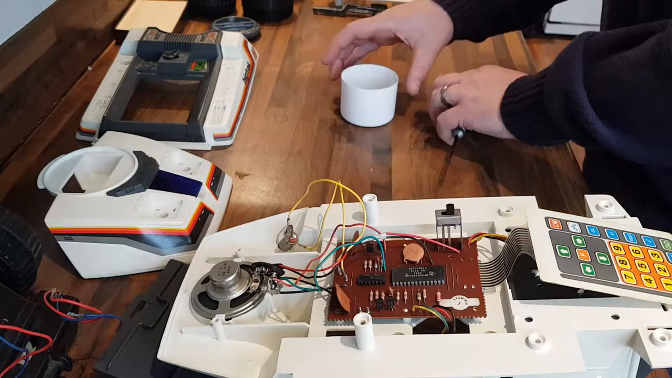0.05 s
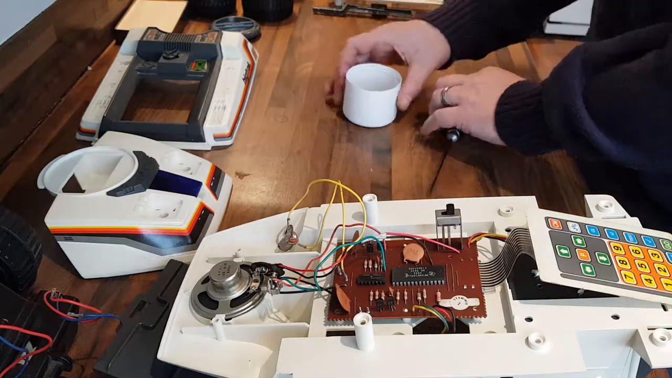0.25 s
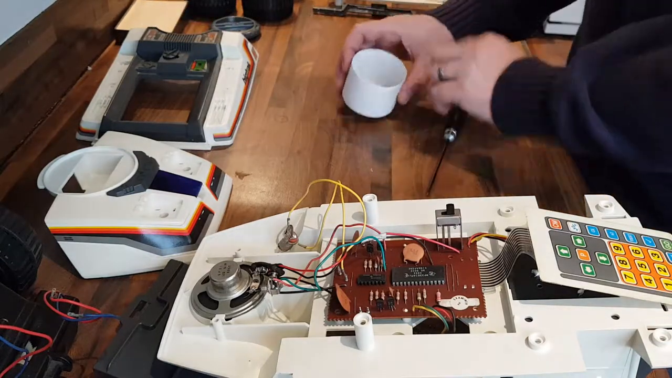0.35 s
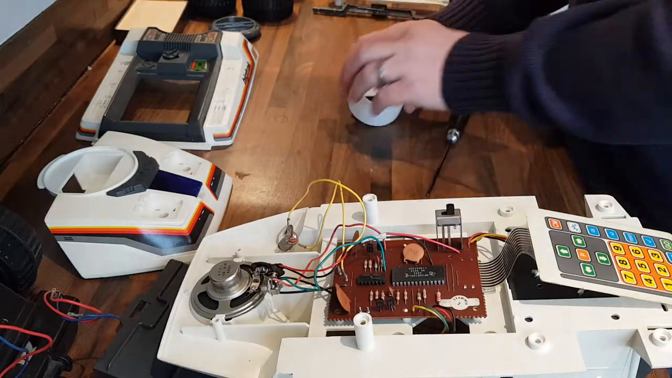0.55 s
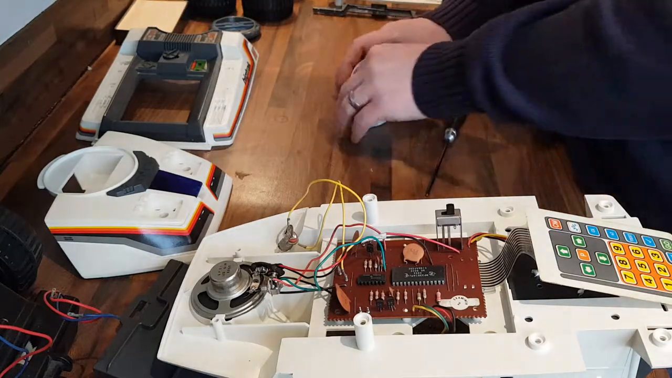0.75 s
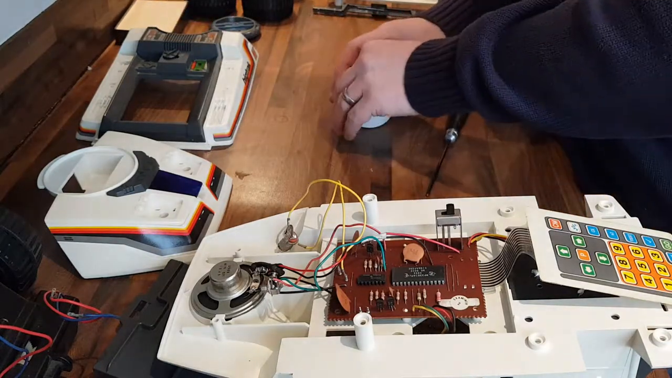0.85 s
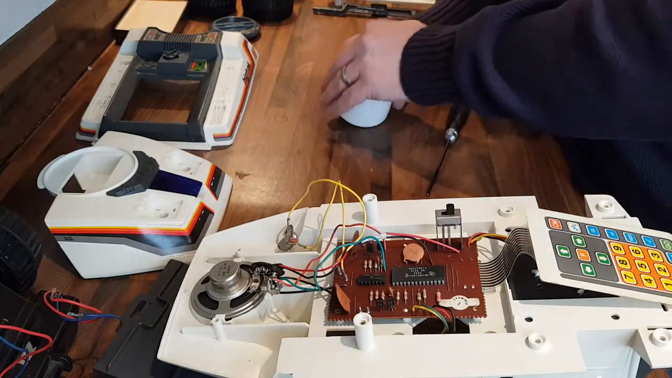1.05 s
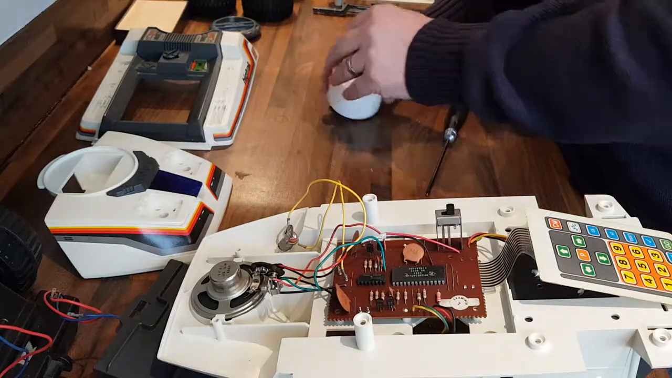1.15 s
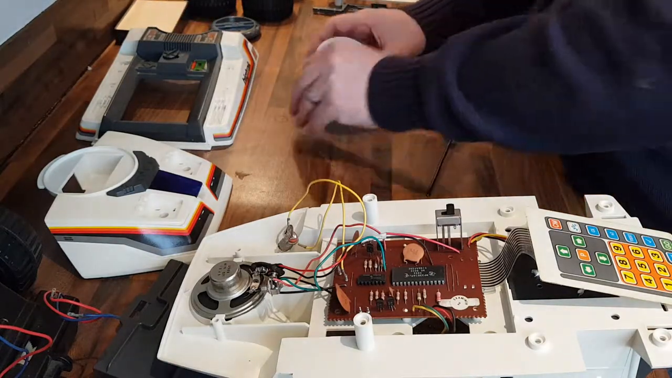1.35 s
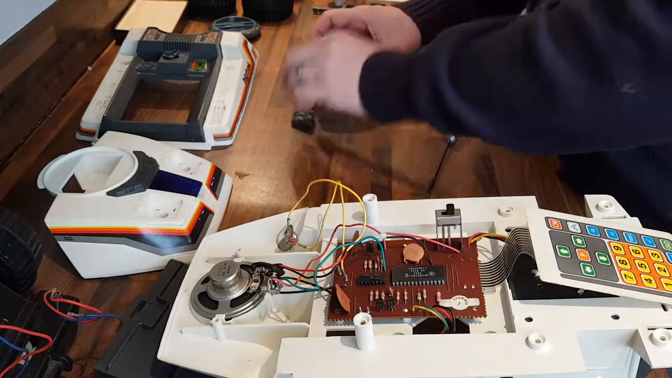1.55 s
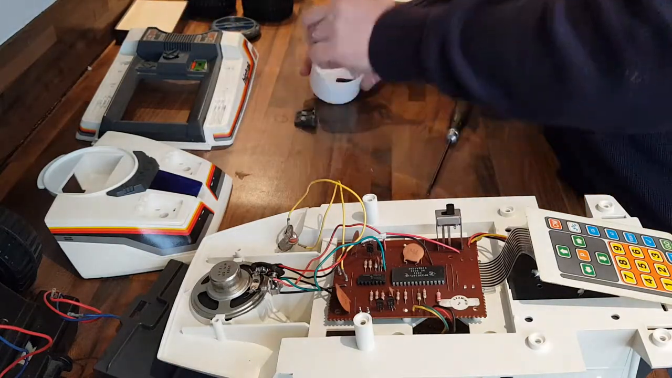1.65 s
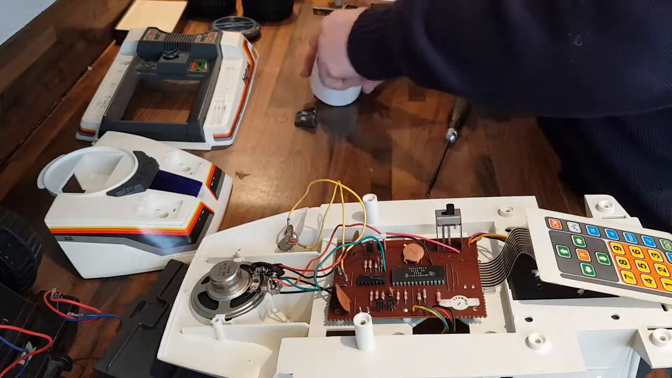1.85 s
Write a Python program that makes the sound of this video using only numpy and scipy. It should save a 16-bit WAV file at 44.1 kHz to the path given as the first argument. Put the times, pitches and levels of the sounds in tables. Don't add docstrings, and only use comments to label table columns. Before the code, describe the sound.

Small steel screws in a plastic pot over a wooden table. Faint ticks at first, then a loud, bright clatter into the pot at 0.2-0.4 s with a soft table thud. Hollow, uneven rattling from 0.55 to 1.1 s, strongest near 0.7. Near quiet, light ticks around 1.3, a rim tap at 1.47, screws landing brightly at 1.55-1.7, and a faint last knock at 1.9. Close stereo, small room.

```python
import sys
import numpy as np
from scipy import signal
from scipy.fft import rfft, irfft, next_fast_len
from scipy.io import wavfile
from scipy.ndimage import map_coordinates

SR = 44100
rng = np.random.default_rng(int(sys.argv[2]) if len(sys.argv) > 2 else 0)


def inscribe(sig):
    pcm = np.round(np.clip(np.atleast_2d(sig).T, -1, 1) * 32767)
    wavfile.write(sys.argv[1], SR, pcm.astype(np.int16))


def voltage_ratio(level):
    return 10 ** (np.asarray(level, float) / 20)


N = 85995
SCATTER_DB = 1.5


def unit(x):
    return x / np.sqrt(np.mean(x ** 2) + 1e-20)


def along(points, hz):
    point_hz, value = np.transpose(points)
    return np.interp(np.log(hz + 1), np.log(point_hz + 1), value)


def filtered(x, response):
    size = next_fast_len(x.shape[-1] + 8192)
    spectrum = rfft(x, size) * response(np.fft.rfftfreq(size, 1 / SR))
    return irfft(spectrum, size)[..., :x.shape[-1]]


def body(peaks):
    def response(f):
        total = 0
        for k, (hz, width_hz, db) in enumerate(peaks):
            damping = 1j * f * width_hz
            total = total + (-1) ** k * voltage_ratio(db) * damping / (hz * hz - f * f + damping)
        return total
    return response


def hollow_cut(f, corner_hz):
    return (1j * f / (corner_hz + 1j * f)) ** 2


def add(track, start_s, sound):
    part = track[max(round(start_s * SR), 0):][:len(sound)]
    part += sound[:len(part)]


# pitch_hz, level_db_per_hz
AIR_TONE = [(20, -15.5), (50, -4), (105, 2.5), (170, -16), (350, -22.5), (1100, -28), (5000, -37.5),
            (16000, -36)]


def air():
    middle, side = filtered(rng.standard_normal((2, N)), lambda f: voltage_ratio(along(AIR_TONE, f)))
    side = filtered(side, lambda f: (f + 30) / (f + 300))
    return voltage_ratio(-62) * unit(np.array([middle + side, middle - side]))


# pitch_hz, t60_s
ROOM_DECAY = [(150, .22), (1000, .26), (4000, .28), (12000, .22)]
# delay_s, level_db
WALLS = [(.0035, -8), (.007, -7), (.011, -13)]


def room(x):
    tail_db, spacing_s, hop, lead = -3, .0004, 4096, 64
    out = np.zeros((2, N + SR))
    padded = np.pad(x, (hop, 2 * hop))
    for start in range(0, N + hop, hop):
        hz, t, z = signal.stft(rng.standard_normal((2, SR // 2)), SR, nperseg=256)
        z[1] = np.where(hz[:, None] < 400, z[0], z[1])
        decay = voltage_ratio(-60 * t / along(ROOM_DECAY, hz)[:, None])
        tail = signal.istft(z * decay, SR, nperseg=256)[1]
        tail = voltage_ratio(tail_db) * tail / np.linalg.norm(tail[0])
        response = np.pad(tail, ((0, 0), (lead + 200, 0)))
        for delay_s, db in [(0.000028, 0.0079)] + WALLS:
            lag = spacing_s * rng.uniform(-1, 1) * SR * np.array([-.5, .5])
            response[[0, 1], np.round(lead + delay_s * SR + lag).astype(int)] += voltage_ratio(db)
        piece = padded[start:start + 2 * hop] * signal.get_window("hann", 2 * hop)
        wet = signal.fftconvolve(piece[None], response, axes=1)
        out[:, start:start + wet.shape[1]] += wet
    return out[:, hop + lead:hop + lead + N]


# start_s, level_db, hollow_db
TUMBLE = [(0, -47.5, -5), (0.198, -72.5, -1), (.25, -72, 0), (0.423, -38, -13), (.5, -52.5, -5),
          (0.561, -53, 5.5), (.78, -43.5, -14), (.83, -59, 8.5), (0.958, -58.5, 12.5), (1.057, -64.5, 2),
          (1.116, -42, -14), (1.222, -100.5, -23.5), (1.358, -51, -10), (1.449, -99, 10),
          (1.539, -56.5, -4), (1.582, -44.5, -3.5), (1.723, -45, -7), (1.822, -86.5, -12), ]
# pitch_hz, level_db_per_hz
CHATTER = [(200, -40), (450, -12), (800, -8), (2200, -6.5), (4220, -17), (5870, -13), (13800, -34.5),
           (16000, -37)]
# pitch_hz, level_db, t60_s
STEEL_IN_POT = [(3070, -8, .025), (4880, -6, .028), (5710, -3, .032), (6080, -4, .022), (6730, -1, .014),
                (7710, -7, .032), (8590, -11, .018), (10020, -12, .015), (11490, -10, .015),
                (13010, -13, .018), (14600, -16, .012)]
# pitch_hz, level_db, t60_s
STEEL_ON_TABLE = [(5210, -7, .025), (5830, -2, .025), (6345, -2, .065), (7640, -12, .07), (7725, -10, .08),
                  (8660, -13, .035), (10830, -11, .025), (11960, -13, .03), (14050, -18, .025)]
# pitch_hz, width_hz, level_db
POT_WALL = [(735, 91, -17), (1028.6, 79, -2), (1130.3, 101, -2), (1307, 70, 0.5), (1403, 120, -5.5),
            (1740, 160, -6.5), (2763, 190, -6), (3290, 330, -10.5), (4120, 290, -12), (5020, 520, -12)]


def tumble():
    contacts_per_s, size_db, grain_t60_s = 760, 3, .0015
    jingle_db, spilled_s, tumble_db = -8, 1.5, 1
    start_s, level_db, hollow_db = np.transpose(TUMBLE)
    t = np.arange(N) / SR
    size = voltage_ratio(size_db * np.minimum(rng.exponential(size=N), 3))
    taps = (rng.random(N) < contacts_per_s / SR) * size
    grains = signal.fftconvolve(taps, voltage_ratio(-60 * t[:2000] / grain_t60_s))[:N] * rng.standard_normal(N)
    bare = unit(filtered(grains, lambda f: voltage_ratio(along(CHATTER, f))))
    jingles = []
    for modes in (STEEL_IN_POT, STEEL_ON_TABLE):
        peaks = [(hz, np.log(1000) / np.pi / t60_s, db) for hz, db, t60_s in modes]
        jingles.append(unit(filtered(grains, body(peaks))))
    hollow = unit(filtered(taps, lambda f: body(POT_WALL)(f) * hollow_cut(f, 700)))
    hollow_gain = voltage_ratio(np.interp(t, start_s, hollow_db))
    metal = voltage_ratio(jingle_db) * np.where(t < spilled_s, *jingles) / (1 + hollow_gain)
    level = voltage_ratio(np.interp(t, start_s, level_db) + tumble_db)
    return level * (bare + metal + hollow_gain * hollow)


# start_s, level_db, upper_modes_db
THUDS = [(.02, -42, 0.5), (0.069, -38, -2), (0.238, -19.5, 2), (.268, -17, 4.5), (0.339, -29.5, 8),
         (0.431, -36, 9.5), (0.57, -36, -0.5), (0.699, -33.5, -5), (0.752, -36.5, -5.5),
         (1.085, -44.5, 2.5), (1.297, -39.5, 1.5), (1.478, -29.5, -14), (1.556, -37, -17),
         (1.656, -32.5, -1.5), (1.904, -43.5, -1.5)]
# pitch_hz, width_hz, level_db
TABLE_TOP = [(124.8, 10.9, -1), (172.7, 11.6, -3.5), (206.5, 23.2, -5.5), (331, 14.7, -8.5),
             (401.4, 8.6, 2.5), (561, 34, -8.5), (840, 25, -23)]


def table():
    thud_db, softness_hz = 44, 453
    low, high = np.zeros((2, N))
    for start_s, db, upper_db in THUDS:
        i = round(start_s * SR)
        low[i] = voltage_ratio(db + thud_db)
        high[i] = voltage_ratio(db + thud_db + upper_db)
    rung = filtered(low, body(TABLE_TOP[:3])) + filtered(high, body(TABLE_TOP[3:]))
    return filtered(rung, lambda f: 1 / (1 + 1j * f / softness_hz) ** 2)


def pot(blows, peaks):
    skid_t60_s, skid_db, knock_db = .011, -18.5, -3
    out, t = np.zeros(N), np.arange(4096) / SR
    for start_s, db, hard_oct in blows:
        edge_hz = 2000 * 2 ** hard_oct
        skid = voltage_ratio(skid_db - 60 * t / skid_t60_s) * rng.standard_normal(len(t))
        blow = (t == 0) + skid
        spot = np.array(peaks) + np.outer(rng.standard_normal(len(peaks)), [0, 0, SCATTER_DB])
        ring = body(spot)
        knock = filtered(blow, lambda f: ring(f) * hollow_cut(f, 600) / (1 + 1j * f / edge_hz) ** 2)
        add(out, start_s, voltage_ratio(db + knock_db) * knock / abs(knock).max())
    return out


# start_s, peak_db, hardness_oct (re 2 kHz)
KNOCKS = [(.522, -30.5, 0.047), (.537, -39, -.3), (.565, -37, -0.43), (.572, -18.5, -0.46),
          (.585, -21, -0.025), (.597, -18, -0.55), (.621, -23, -0.1), (.633, -29.5, -0.2),
          (.646, -29, -0.52), (.665, -36, -0.42), (.6995, -12, -0.36), (.715, -26, -0.1),
          (.729, -16.5, -.2), (.749, -18.5, -0.097), (.759, -22, -0.096), (.768, -20.5, -0.48),
          (.775, -23, 0.21), (.783, -25, -.3), (.807, -27, -0.16), (.84, -26.5, -0.78), (.851, -30, -0.54),
          (.869, -34, 0.0022), (.886, -22.5, 0.31), (.893, -30, -0.16), (.908, -27, -0.17),
          (.935, -27, -0.029), (.95, -22.5, 0.017), (.973, -42, -.3), (.982, -35, -.1),
          (1.016, -30.5, -0.47), (1.029, -41, -0.21), (1.075, -30.5, -0.18), (1.0855, -18.5, -0.31),
          (1.092, -18.5, 0.01), (1.102, -23, -0.53), (1.13, -41, -0.32), (1.296, -38, -0.11),
          (1.305, -34, 0.28), (1.333, -34, -0.26), (1.343, -30, -0.0047), (1.555, -28.5, -.1),
          (1.6, -30, 0.021), (1.666, -23, -0.14), (1.895, -42.5, -.4), (1.903, -33, -0.35),
          (1.909, -36.5, -0.24), (1.916, -20, -0.77), (1.93, -40, -.3)]


def knocks():
    bounce_db, bounce_s = -9, .00022
    direct = pot(KNOCKS, POT_WALL)
    return filtered(direct, lambda f: 1 + voltage_ratio(bounce_db) * np.exp(-2j * np.pi * f * bounce_s))


# start_s, peak_db, hardness_oct (re 2 kHz)
DROPS = [(0.219, -15.5, 0.69), (0.2412, -1.5, 0.74), (0.2468, -6, 0.2), (.254, -13, .2),
         (0.2655, -6.5, 0.4), (.274, -12.5, .3), (0.281, -13, 0.3), (0.291, -10, 0.3), (.298, -34, .1),
         (.305, -25, .1), (0.3105, -13, 0.36), (.317, -19, .2), (0.333, -25, 0.4), (0.36, -18.5, 0.5)]
# pitch_hz, width_hz, level_db
POT_FLOOR = [(764, 80, -5.5), (1133, 133, -3), (1355, 92, -1), (1677, 98, -2), (1954, 59, -0.5),
             (2380, 270, -6.5), (2733, 160, -7.5), (2905, 130, -10.5)]


def drops():
    return pot(DROPS, POT_FLOOR)


def steel(hits, modes):
    ring_max_s, pitch_spread, fuzz, fuzz_hz = .1, .003, .9, 170
    crack_oct, crack_t60_s, rise_s = 1.02, .021, .0004
    out, t = np.zeros(N), np.arange(SR // 3) / SR
    hz, level_db, t60_s = np.transpose(modes)[:, :, None]
    fuzz_at = np.meshgrid(np.arange(len(modes)), t * fuzz_hz, indexing="ij")
    for start_s, db, centre_oct, ring_db in hits:
        level_luck, pitch_luck = rng.standard_normal((2, len(modes), 1))
        decay_db = -60 * t / np.clip(t60_s, .01, ring_max_s)
        ring = voltage_ratio(level_db + SCATTER_DB * level_luck + decay_db)
        ring = ring * np.sin(2 * np.pi * hz * (1 + pitch_spread * pitch_luck) * t)
        ring = ring * (1 + fuzz * map_coordinates(rng.standard_normal((len(modes), 60)), fuzz_at, order=1))
        hiss = unit(filtered(rng.standard_normal(len(t)), lambda f: np.exp(
            -((np.log2((f + 1) / 4000) - centre_oct) / crack_oct) ** 2 / 2)))
        crack = hiss * voltage_ratio(-60 * t / crack_t60_s)
        rise = 1 - np.exp(-t / rise_s)
        add(out, start_s, voltage_ratio(db - 5) * (voltage_ratio(ring_db) * ring.sum(0) + crack) * rise)
    return out


# start_s, peak_db, crack_centre_oct (re 4 kHz), ring_db
RIM_HITS = [
    (1.4715, -41, -0.33, 1),
    (1.474, -26.5, -0.45, -5),
    (1.483, -40, -.6, -7),
    (1.491, -40, -1.2, -11),
    (1.5, -43, -0.62, 3.5),
    (1.515, -45, -0.88, -2),
]
# pitch_hz, level_db, t60_s
RIM_MODES = [(1105, -7, .025), (1790, -3, .04), (2985, -7, .02), (3855, -5, .016), (4870, 0, .032),
             (5515, -3, .025), (6140, 0, .02), (6735, -8, .015)]


def rim_hits():
    return steel(RIM_HITS, RIM_MODES)


# start_s, peak_db, crack_centre_oct (re 4 kHz), ring_db
SPILLS = [
    (1.547, -20.5, -0.99, -18),
    (1.5557, -16, 0.046, -3.5),
    (1.600, -29.5, 0.38, -27),
    (1.6202, -14, 0.2, -5),
    (1.650, -28.5, -0.49, -25),
    (1.686, -32.5, -0.44, -4),
    (1.711, -29.5, -0.51, -7),
]


def spills():
    return steel(SPILLS, STEEL_ON_TABLE)


# start_s, peak_db, crack_centre_oct (re 4 kHz), ring_db
CLINKS = [(.0088, -21, -0.13, -17.5), (.025, -28.5, -0.28, -55), (.037, -61, -0.66, -18),
          (.145, -30.5, -1.1, -39), (.2145, -40, 0.017, -19), (.2182, -5, -0.25, -6.5),
          (.223, -13.5, -0.62, -3), (.2305, -21.5, .2, -11), (.2703, -13.5, 0.44, -1.5),
          (.277, -18.5, -0.5, -8), (.3092, -15, -0.6, -24), (.325, -17, 0.11, -2.5),
          (.331, -16.5, 0.14, -2.5), (.365, -20, 1.2, -1.5), (.3695, -16.5, 0.2, -8.5),
          (.393, -27.5, 0.6, -5.5), (.399, -20, 0.1, 0), (.446, -25, 0.43, -2), (.5716, -24, -0.67, -16),
          (.6145, -14.5, -0.82, -18), (.6714, -50, 0.16, 7), (.7003, -24.5, -0.092, -16),
          (.7255, -26, -0.024, -32.5), (.7565, -17.5, 0.46, -18), (.8674, -25, -0.87, -10.5),
          (.9348, -38, -0.58, -6), (1.016, -37.5, -1.2, -4), (1.0864, -18.5, -0.9, -54),
          (1.119, -28, -0.063, -33), (1.3042, -34, -0.63, -24), (1.344, -35, -0.53, -46),
          (1.351, -49.5, -0.94, -31.5), (1.893, -46, -0.43, -29), (1.904, -36, -0.58, -26),
          (1.913, -34.5, -0.74, -17)]


def clinks():
    return steel(CLINKS, STEEL_IN_POT)


def scene():
    left_db = 0.97
    metal = clinks() + spills() + rim_hits()
    plastic = knocks() + drops()
    contacts = metal + plastic + tumble() + table()
    return room(contacts) * voltage_ratio([[left_db], [-left_db]]) + air()


def top_cut(x):
    return signal.sosfilt(signal.butter(12, 16490, fs=SR, output="sos"), x)


def record(dry):
    mix = filtered(dry, lambda f: f < 16200)
    return top_cut(mix)


dry = scene()
out = record(dry)
inscribe(out)
```